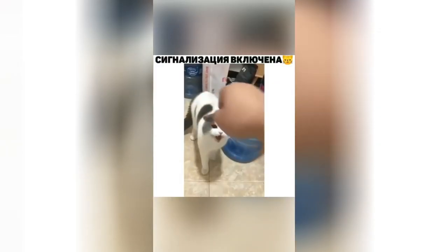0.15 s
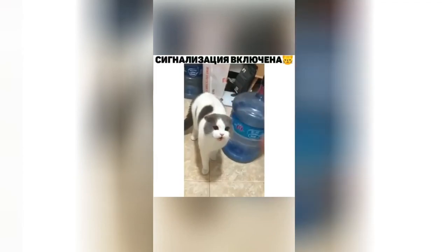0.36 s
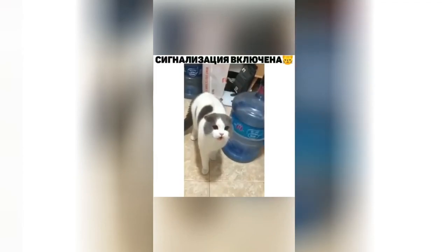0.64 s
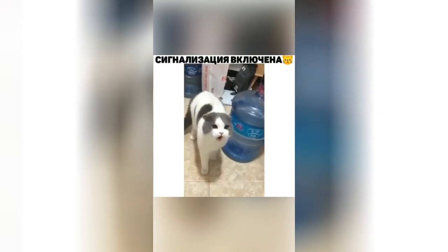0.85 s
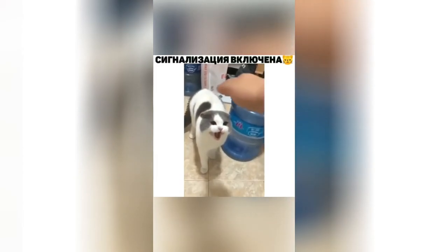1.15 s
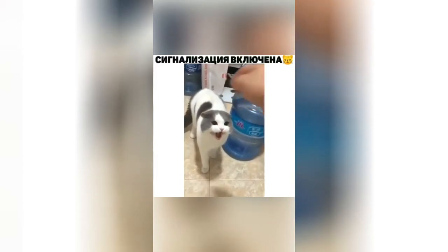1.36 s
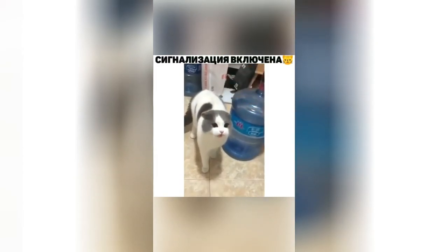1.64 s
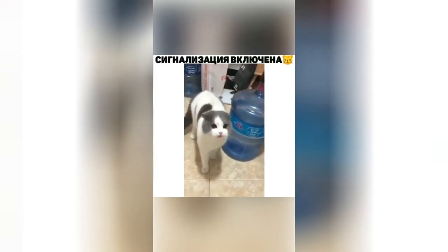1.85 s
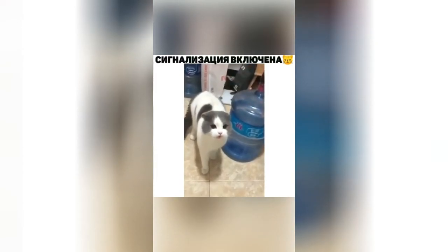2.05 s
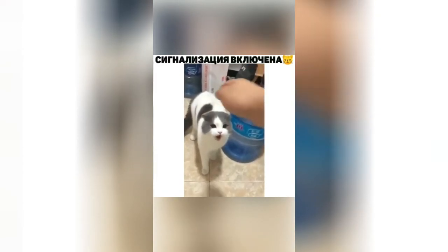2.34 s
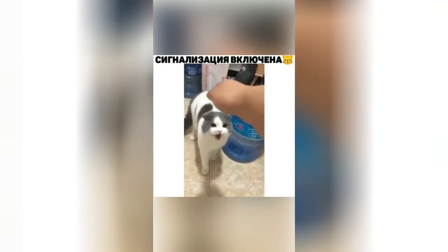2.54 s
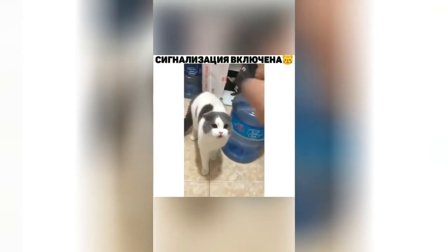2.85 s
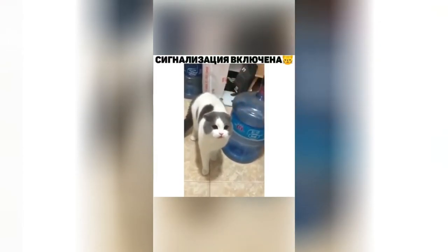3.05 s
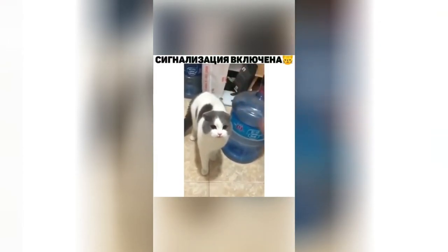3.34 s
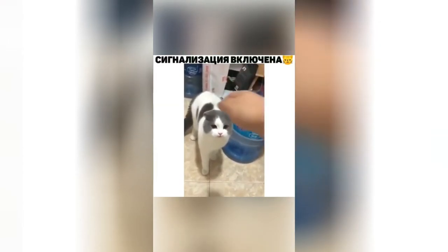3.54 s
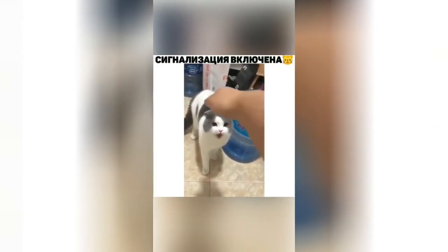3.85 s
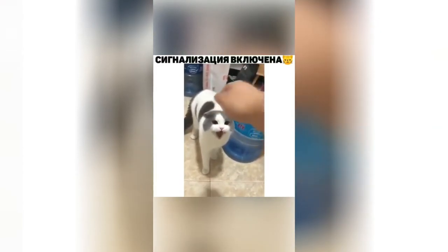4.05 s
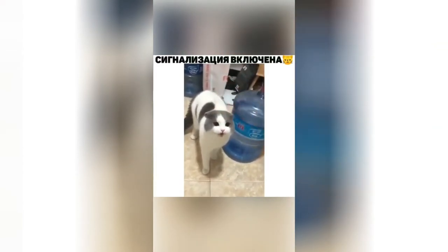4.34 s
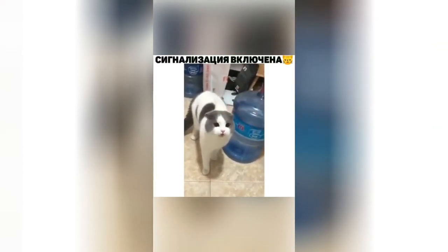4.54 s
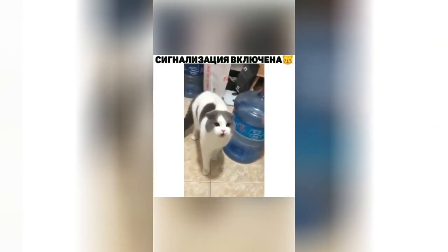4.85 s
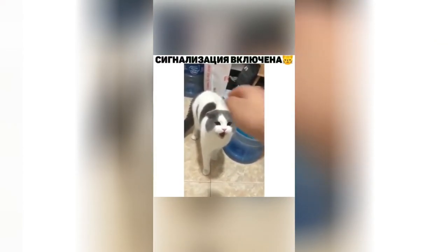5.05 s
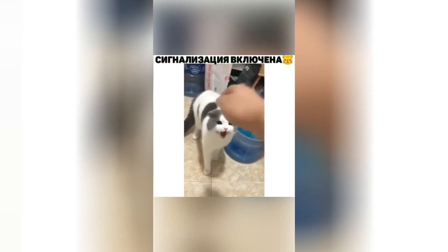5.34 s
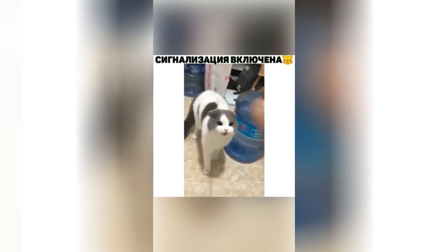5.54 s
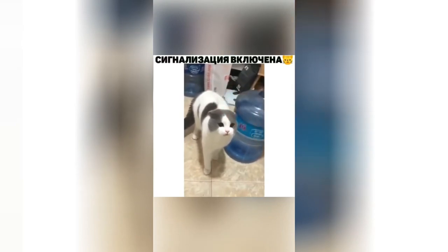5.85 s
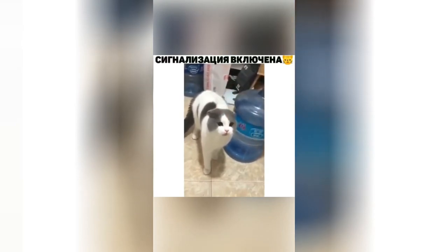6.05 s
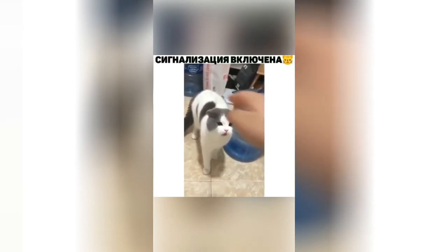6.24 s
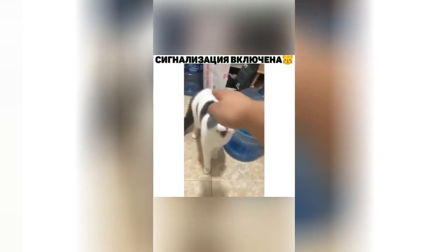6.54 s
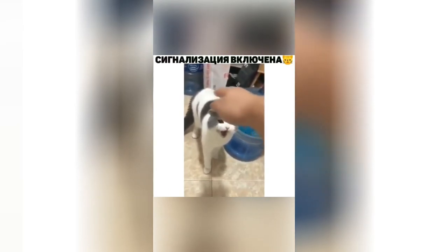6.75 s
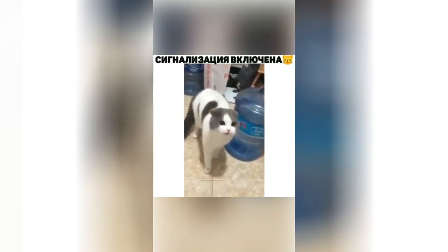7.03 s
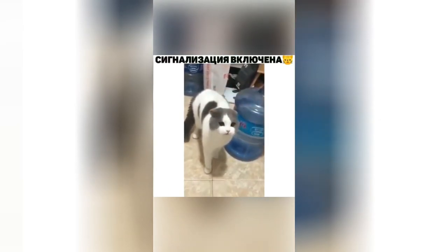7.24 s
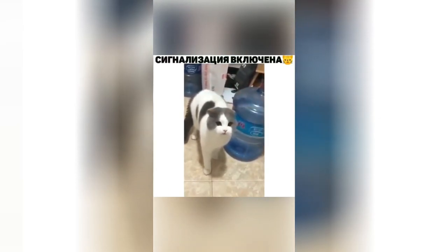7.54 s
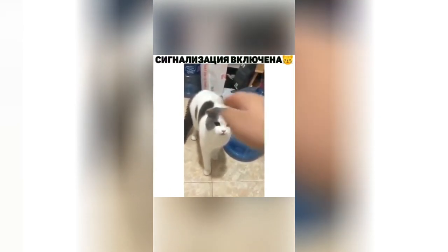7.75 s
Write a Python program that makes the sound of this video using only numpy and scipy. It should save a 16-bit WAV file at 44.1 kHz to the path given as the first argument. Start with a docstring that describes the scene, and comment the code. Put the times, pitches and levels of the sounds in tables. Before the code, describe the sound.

A cat yowls twice at length close by in a small tiled room, each yowl wavering in three swells, with faint rustling and a knock between.

```python
"""A small tiled room: a cat yowls twice, close to the microphone, over faint room noise and hum.
Each yowl swells three times as the mouth opens and shuts: an uneven pulse train through moving resonances.
Between the yowls a hand rustles over fur, in grainy strokes of filtered noise,
and something knocks once, in decaying sines under a crack of noise.
Early echoes, a sparse tail and ringing modes place cat, hand and knock in the room."""
import sys
import numpy as np
from scipy import signal
from scipy.io import wavfile
from scipy.ndimage import uniform_filter1d

SR = 44100
rng = np.random.default_rng(int(sys.argv[2]) if len(sys.argv) > 2 else 0)


def log_audio(samples):
    """Write samples as a 16-bit WAV file to the path given in sys.argv[1]."""
    # one column per channel
    frames = np.atleast_2d(samples).T
    # limit to full scale, then quantise
    limited = np.clip(frames, -1, 1)
    pcm = np.round(limited * 32767).astype(np.int16)
    wavfile.write(sys.argv[1], SR, pcm)


N = 347949
BAND_LIMIT_HZ = 15600  # nothing of the voice or the final sound reaches far above this


def gain_of(db):
    """Decibels to gain."""
    return 10 ** (np.asarray(db) / 20)


def smoothed_twice(x, size):
    """Two running means in a row, over size samples each."""
    return uniform_filter1d(uniform_filter1d(x, size=size), size=size)


def evened(x):
    """Scales to rms 1."""
    return x / np.sqrt(np.mean(x ** 2) + 1e-20)


def steadied(x):
    """Scales to a running rms of 1."""
    return x / np.sqrt(abs(smoothed_twice(x ** 2, 600)) + 1e-12)


def read(points, hz):
    """Reads a table on a log frequency axis."""
    f, value = np.transpose(points)
    return np.interp(np.log(hz + 1), np.log(f + 1), value)


def curve(points):
    """A dB curve over the whole time, as gain."""
    return gain_of(np.interp(np.arange(N) / SR, *np.transpose(points)))


def add(mix, s, sound):
    """Mixes a sound in at time s."""
    part = mix[round(s * SR):][:len(sound)]
    part += sound[:len(part)]


def resonate(x, hz, width, order=1):
    """Shifts the curve hz down to zero, smooths, and shifts back: a resonance; repeats darken its skirts."""
    turn = np.exp(2j * np.pi * np.cumsum(hz * np.ones(len(x))) / SR)
    r = np.exp(-np.pi * width / SR)
    for _ in range(order):
        smooth = signal.lfilter([1 - r], [1, -r], x * turn.conj() + 1e-18)
        x = 2 * (turn * smooth).real
    return x


def through(x, modes, order=2):
    """A bank of steep resonances, neighbours of opposite sign."""
    bank = 0
    for k, (hz, width, db) in enumerate(modes):
        bank = bank + (-1) ** k * gain_of(db) * resonate(x, hz, width, order=order)
    return bank


# Spectrum of the room noise, relative: [pitch_hz, level_db per Hz]
AIR_SPECTRUM = [(15, -70), (25, -35.5), (45, -13.5), (69, -14.5), (172, -15.5), (301, -17.5), (415, -22),
                (543, -37.5), (621, -26), (1280, -30.5), (3350, -36), (15000, -52)]
# Rise and fall of the noise, on top of AIR_DB: [time_s, level_db]
AIR_SWELL = [(0, 7.5), (3.3, 3), (3.9, 8.5), (4.2, 6.5), (7.3, 6), (7.6, 5), (7.89, 3.5)]
# Level of the low hum: [time_s, level_db]
HUM_LEVEL = [(0, -83.5), (7.35, -90), (7.55, -68), (7.89, -68)]
AIR_DB = -71.5


def air():
    """Shaped noise with drifting patches, and a low hum that swells at the end."""
    frames, hz = N // 256 + 5, np.fft.rfftfreq(1024, 1 / SR)
    a, b, patches = rng.standard_normal((frames, 513, 3)).T
    patches = uniform_filter1d(patches, size=10, axis=0)  # across frequency
    patches = evened(uniform_filter1d(patches, size=12, axis=1))  # along time
    z = (a + 1j * b) * gain_of(read(AIR_SPECTRUM, hz)[:, None] + 1.5 * patches)
    noise = evened(signal.istft(z, nperseg=1024, noverlap=768)[1][:N])
    hum = evened(through(rng.standard_normal(N), [(65, 25, 0)]))
    return gain_of(AIR_DB) * curve(AIR_SWELL) * noise + curve(HUM_LEVEL) * hum


# Early echoes off floor and furniture: [delay_s, level_db]
ECHOES = [(.0011, -1), (.0026, -9.5), (.0043, -14), (.0071, -6.5), (.0104, -10), (.0152, -13)]
# How long each band of the tail takes to fall by 60 dB: [pitch_hz, t60_s]
TAIL_DECAY = [(250, 0.49), (660, 0.36), (1740, 0.46), (4590, 0.41)]
# Ringing modes of the room: [pitch_hz, width_hz, level_db]
ROOM_MODES = [(870, 4, -10), (1191.5, 120, -6), (1520, 35, -6.5), (1663, 8.3, 1.5)]
TAIL_DB = -9.5


def room(x):
    """A few early echoes, sparse taps of random sign with each band dying at its own speed, and ringing modes."""
    early = np.zeros(2000)
    early[0] = 1
    for k, (s, db) in enumerate(ECHOES):
        early[round(s * SR)] = (-1) ** k * gain_of(db)
    taps = np.zeros(SR)
    at = np.arange(700, SR - 20, 20)
    taps[at + rng.integers(0, 20, len(at))] = rng.choice([-1., 1.], len(at))
    hz, t, z = signal.stft(taps, SR, nperseg=256)
    # soft furnishings and distance leave little bass in the tail
    thin_db = -12 * np.maximum(np.log2(800 / (hz + 1)), 0)
    decay_db = -60 * t / read(TAIL_DECAY, hz)[:, None]
    tail = signal.istft(z * gain_of(thin_db[:, None] + decay_db), SR, nperseg=256)[1]
    modes = sum(gain_of(db) * resonate(x, f, w) for f, w, db in ROOM_MODES)
    close = signal.oaconvolve(x, early / np.linalg.norm(early))[:N]
    far = signal.fftconvolve(x, tail / np.linalg.norm(tail))[:N]
    return close + gain_of(TAIL_DB) * far + modes


# Strokes of the hand over fur: [start_s, length_s, level_db before fades and room, centre_hz, width_hz]
RUSTLES = [(3.423, 0.14, -71.5, 7500, 6000), (3.62, 0.032, -64.5, 5830, 6050),
           (3.777, 0.069, -60, 8260, 3500), (3.808, 0.097, -70, 5350, 2500),
           (3.933, 0.034, -51, 2960, 3940), (3.426, 0.14, -70, 1575, 686), (3.754, .12, -68.5, 1406, 703)]


def rustle(length, db, hz, width):
    """A short stroke: noise of grainy loudness through one resonance, faded at both ends."""
    n = round(length * SR)
    grain_db = 2.5 * evened(uniform_filter1d(rng.standard_normal(n), size=150))
    grains = rng.standard_normal(n) * gain_of(grain_db)
    stroke = evened(through(grains, [(hz, width, 0)]))
    return gain_of(db) * stroke * signal.windows.tukey(n, .9)


# Contacts that make up the one knock: [start_s, thump_gain_db, tap_gain_db]
KNOCKS = [(3.927, -34, -52.5), (3.9412, -46, -38.5), (3.961, -44, -50)]
# Low mode of the thump: [pitch_hz, relative_level_db, t60_s]
THUMP_MODES = [(152, -10, 0.21)]
# Higher modes of the tap: [pitch_hz, relative_level_db, t60_s]
TAP_MODES = [(1350, 14, 0.016), (2260, 2.5, 0.026), (3530, 5, 0.02), (4940, -10, 0.034), (8000, -23, .015)]


def ring(t, modes):
    """Struck modes: each a sine that dies away at its own speed."""
    return sum(gain_of(db - 60 * t / t60) * np.sin(2 * np.pi * hz * t) for hz, db, t60 in modes)


def knock(thump_db, tap_db):
    """A low thump, and a tap that rings higher modes under a short crack."""
    t = np.arange(6000) / SR
    crack = 0.29 * rng.standard_normal(len(t)) * gain_of(-60 * t / 0.0091)
    tap = (ring(t, TAP_MODES) + crack) / 2
    return gain_of(thump_db) * ring(t, THUMP_MODES) + gain_of(tap_db) * tap


# The folds beat less evenly the wider the mouth: [mouth_hz, random_depth_db, strong_weak_alternation_db]
UNEVEN_BY_MOUTH = [(1250, -37, -45), (1700, -28, -38), (2200, -26, -34)]
# Passages where the voice breaks, with fades outside start and end:
# [start_s, end_s, fade_in_s, fade_out_s, random_depth_db, strong_weak_alternation_db]
RASPS = [(0, .09, .01, .06, -15, -26), (.23, .36, .04, .04, -13, -17), (1.26, 1.44, .04, .015, -8, -15),
         (1.82, 1.9, .07, .08, -15, -13), (2.5, 2.97, .1, .07, -23, -11), (3.055, 3.09, .02, .01, -2, -25),
         (4.07, 4.26, .01, .06, -13, -16), (5.28, 5.6, .1, .03, -17, -16), (6.69, 6.79, .08, .04, -14, -20),
         (7.12, 7.28, .1, .03, -22, -21), (7.3, 7.33, .02, .01, -4, -25)]


def unevenness(t, mouth_hz):
    """Random depth and alternation as gains: a base set by the mouth, drawn to each rasp's own values."""
    at, *base = np.transpose(UNEVEN_BY_MOUTH)
    random_db, alternate_db = (np.interp(mouth_hz, at, c) for c in base)
    for start, end, rise, fall, rasp_db, growl_db in RASPS:
        share = np.interp(t, [start - rise, start, end, end + fall], [0, 1, 1, 0])
        random_db = random_db + share * (rasp_db - random_db)
        alternate_db = alternate_db + share * (growl_db - alternate_db)
    return gain_of(random_db), gain_of(alternate_db)


LIMP = .03  # pulses come early and late by turns, by this share of a cycle at full alternation
WAVER, RASP_WAVER = .0015, .03  # pitch wobble as a share of pitch: always, and added at full roughness


def folds(t, hz, rough, alternate):
    """The vocal folds: partials from the second up, uneven in strength and timing; air hiss; the fundamental."""
    waver = evened(smoothed_twice(rng.standard_normal(len(t)), 400))
    turns = np.cumsum(hz * (1 + (WAVER + RASP_WAVER * rough) * waver)) / SR
    # one draw for each cycle
    strong, early = rng.standard_normal((len(t), 2))[np.round(turns).astype(int)].T
    by_turns = alternate * np.cos(np.pi * turns)
    shifted = turns + .09 * rough ** 2 * uniform_filter1d(early, size=40) + LIMP * by_turns
    below_limit = np.clip((BAND_LIMIT_HZ - np.arange(2, 60)[:, None] * hz) / 500, 0, 1)
    # higher partials swell and fade each on their own
    drift = evened(uniform_filter1d(rng.standard_normal((len(t) // 500 + 2, 58)), size=14, axis=0))
    drift_gain = gain_of(drift * np.clip(np.arange(58) - 3, 0, 4.5))
    drift_s = np.arange(len(drift)) * 500 / SR
    pulses = 0
    for k, fade in enumerate(below_limit):
        level = fade * np.interp(t - t[0], drift_s, drift_gain[:, k])
        pulses = pulses + level * np.cos(2 * np.pi * (k + 2) * shifted)
    breath = (0.005 + 0.033 * rough) * rng.standard_normal(len(t))
    drive = evened(pulses) * (1 + rough * strong + by_turns) + breath
    # air in puffs, one a cycle
    hiss = (.13 + 1.6 * rough) * rng.standard_normal(len(t)) * (1 + np.cos(2 * np.pi * turns))
    low = np.sqrt(2) * (np.cos(2 * np.pi * turns) * (1 + 1.1 * rough * strong) + 0.087 * by_turns)
    return drive, hiss, resonate(low, hz, 500)


MOUTH_SHUT_WIDTH_HZ, MOUTH_OPEN_WIDTH_HZ = 228, 1053
CHEEK_SHUT_WIDTH_HZ, CHEEK_OPEN_WIDTH_HZ = 900, 1510


def mouth_and_cheek(drive, mouth_hz, opening):
    """Moving mouth and cheek resonances; an open mouth radiates more, so its peaks are wider."""
    cheek_hz = 2500 + 0.36 * mouth_hz  # rises less than the mouth's
    # an open mouth is full below its peak
    shoulder = gain_of(-9.5) * resonate(drive, 0.66 * mouth_hz, 850, order=3)
    mouth_shut = resonate(drive, mouth_hz, MOUTH_SHUT_WIDTH_HZ, order=4)
    mouth_open = resonate(drive, mouth_hz, MOUTH_OPEN_WIDTH_HZ, order=4) - shoulder
    cheek_shut = resonate(drive, cheek_hz, CHEEK_SHUT_WIDTH_HZ, order=4)
    cheek_open = resonate(drive, cheek_hz, CHEEK_OPEN_WIDTH_HZ, order=3)
    mouth = (1 - opening) * mouth_shut + opening * mouth_open
    cheek = (1 - opening) * cheek_shut + opening * cheek_open
    return mouth, cheek


# One table a yowl, three swells each:
# [time_s, pitch_hz, mouth_resonance_hz, effort_db, upper_resonances_db]
YOWLS = [
    [(0.0, 239, 1740, -25, -4), (0.03, 273.6, 1800, -31, -3.5), (0.08, 350, 2050, -25, -9.5),
     (0.12, 419.3, 2310, -17, -12), (0.2, 458.6, 2240, -22.5, 0.5), (0.27, 480.7, 2454, -24, 0.5),
     (0.39, 431.8, 2030, -23.5, 1.5), (0.52, 417.8, 1610, -24.5, 5), (0.6, 415.2, 1390, -25, -4),
     (0.73, 409.4, 1190, -25, -2), (0.83, 399.5, 1322, -27.5, -10.5), (0.99, 394.2, 1362, -26, 4),
     (1.07, 404.3, 1616, -23, 0), (1.23, 434.8, 2090, -21.5, 2.5), (1.27, 470, 2364, -23.5, 1.5),
     (1.39, 512, 2625, -18.5, -3.5), (1.49, 510.8, 2360, -17, -0.5), (1.63, 484.8, 2390, -22.5, 1.5),
     (1.78, 435.2, 1734, -22.5, 5.5), (1.86, 424, 1588, -21, 0.5), (1.94, 414.4, 1215, -26, 3.5),
     (2.11, 395.2, 1233, -26, -4.5), (2.27, 375.2, 1105, -28.5, 13), (2.46, 379.5, 1598, -22, 0.5),
     (2.6, 405.2, 2005, -21, -0.5), (2.69, 433.7, 2240, -15.5, -3.5), (2.82, 430.3, 2140, -15, -4),
     (2.96, 385.8, 1600, -20, -2), (3.06, 361.7, 1506, -32, -5), (3.085, 360, 1583, -48, -8)],
    [(4.07, 195, 1730, -34.5, -15), (4.11, 271.3, 1810, -25.5, -4.5), (4.155, 345.7, 2000, -26.5, -5),
     (4.2, 394, 2180, -17.5, -6), (4.27, 454, 2320, -19, -4), (4.34, 461, 2360, -24.5, 3.5),
     (4.48, 427.6, 1870, -23.5, -1), (4.53, 414, 1530, -27, 5.5), (4.67, 407.1, 1264, -28.5, 2),
     (4.96, 396.5, 1249, -30, 1.5), (5.08, 393, 1620, -23.5, -3), (5.18, 404.2, 1674, -23, -5),
     (5.34, 447, 2210, -21, 3.5), (5.41, 486.4, 2390, -23, 2), (5.57, 513, 2620, -17, -2),
     (5.63, 467, 2230, -22.5, 3), (5.7, 425.5, 1686, -23.5, 6), (5.77, 423, 1680, -19.5, 2.5),
     (5.85, 414.8, 1550, -22.5, -10.5), (6.0, 392.5, 1220, -33, -12), (6.14, 373.9, 1150, -33.5, -13.5),
     (6.3, 365.7, 1257, -25, -6.5), (6.44, 352.7, 1480, -24, -8.5), (6.59, 369, 1533, -22.5, -3),
     (6.7, 427, 2063, -18, -3), (6.82, 495.1, 2438, -23.5, 5.5), (7.0, 462.5, 2200, -22, 7.5),
     (7.09, 465.8, 2160, -22.5, 4.5), (7.16, 437.7, 1890, -22, 3), (7.23, 402.5, 1540, -19.5, -2.5),
     (7.31, 385, 1578, -31.5, 0.5), (7.33, 405, 1570, -55, 3)],
]
# Fixed throat resonances: [centre_hz, width_hz, relative_level_db]
THROAT = [(729, 977, -8), (1327, 620, -7)]
# Top resonances with the mouth shut: [centre_hz, width_hz, relative_level_db]
EDGE = [(4760, 1500, 8.5), (5820, 1200, 1.5), (6840, 2400, -5), (8890, 1400, -6.5), (10480, 1100, -12),
        (12800, 2000, -27)]
# As the mouth opens the sound moves from throat to mouth; levels against effort:
# [mouth_hz, throat_db, mouth_db, cheek_db, edge_db, fundamental_db]
BALANCE_BY_MOUTH = [(1200, 0, -10.5, -28, -30, -10), (1530, -4, -4, -20.5, -25.5, -14),
                    (2230, -15, -3.5, -12, -26.5, -20.5), (2450, -21.5, -1.5, -5.5, -24, -20)]
# Rise and fall of the cheek and top resonances over time, added in dB: [time_s, cheek_db, edge_db]
TREBLE = [(0, 0.5, 6), (.3, 0, -9), (0.699, -4, 1.5), (1.2, -3, -1.5), (1.45, 2.5, 6), (1.8, 0, 1.5),
          (2.1, 1.5, -3), (2.5, 0.5, -3), (2.8, -1, 1), (3.09, 4, 4), (4.07, 7, 5), (4.3, 1, 0),
          (4.8, -1, -1.5), (5.3, 0.5, -3.5), (5.7, -2, -2), (6.1, 1.5, 5.5), (6.6, 2, 1), (6.9, -2.5, 1),
          (7.33, -0.5, 0)]
# the fundamental follows effort almost fully, its swings about this level slightly reduced
LOW_REDUCTION, LOW_CENTRE_DB = 0.078, -28.5
LOW_FULL_HZ, LOW_DB_PER_OCTAVE = 386, 18.5  # a small head radiates little below this pitch


def yowl(rows):
    """The folds' uneven pulses pass the throat, the moving mouth and cheek and the higher resonances."""
    s, *columns = np.transpose(rows)
    t = np.arange(max(s[0], 0), s[-1], 1 / SR)
    hz, mouth_hz, effort_db, upper_db = (np.interp(t, s, c) for c in columns)
    hz = uniform_filter1d(hz, size=2600, mode="nearest")

    at, *balance = np.transpose(BALANCE_BY_MOUTH)
    levels_db = (effort_db + np.interp(mouth_hz, at, c) for c in balance)
    throat_db, mouth_db, cheek_db, edge_db, low_db = levels_db
    low_db = low_db - LOW_REDUCTION * (effort_db - LOW_CENTRE_DB)
    low_db = low_db + LOW_DB_PER_OCTAVE * np.minimum(np.log2(hz / LOW_FULL_HZ), 0)
    at, cheek_swell_db, edge_swell_db = np.transpose(TREBLE)
    cheek_db = cheek_db + np.interp(t, at, cheek_swell_db)
    edge_db = edge_db + np.interp(t, at, edge_swell_db)

    drive, hiss, low = folds(t, hz, *unevenness(t, mouth_hz))
    opening = np.clip((mouth_hz - 1300) / 900, 0, 1)  # 0 shut, 1 open
    mouth, cheek = mouth_and_cheek(drive, mouth_hz, opening)
    # the top resonances rise a little as the mouth opens
    edge_modes = [(f * (1 + 0.082 * opening), w, db) for f, w, db in EDGE]
    throat = through(drive, THROAT, order=3)
    edge = through(drive + hiss, edge_modes, order=3)
    voice = (gain_of(throat_db) * steadied(throat)
             + gain_of(mouth_db + upper_db) * steadied(mouth)
             - gain_of(cheek_db + upper_db) * steadied(cheek)
             + gain_of(edge_db + upper_db) * steadied(edge)
             + gain_of(low_db) * low)
    fade_in = np.clip((t - t[0]) / 0.023, 0, 1)
    fade_out = np.clip((t[-1] - t) / 0.02, 0, 1)
    return t[0], voice * fade_in * fade_out


def scene():
    """Cat, rustles and knock in the room, over the air."""
    near = np.zeros(N)
    for rows in YOWLS:
        add(near, *yowl(rows))
    for s, *row in RUSTLES:
        add(near, s, rustle(*row))
    for s, *row in KNOCKS:
        add(near, s, knock(*row))
    return (room(near) + air())[None]


def record(dry):
    """The microphone bends loud sound a little, loses the lowest bass and dulls the top; then the band limit."""
    bass_cut = signal.butter(1, 40, "high", fs=SR, output="sos")
    top_cut = signal.butter(2, 11000, fs=SR, output="sos")
    bent = signal.sosfilt(bass_cut, dry + .07 * dry ** 2)
    dulled = signal.sosfilt(top_cut, bent)
    band = signal.firwin(511, BAND_LIMIT_HZ, window=("kaiser", 9), fs=SR)
    return signal.oaconvolve(dulled, band[None], "same")


dry = scene()
out = record(dry)
log_audio(out)
```